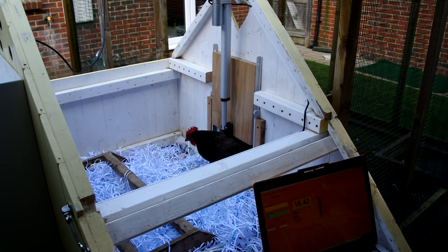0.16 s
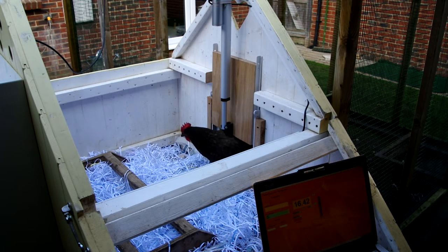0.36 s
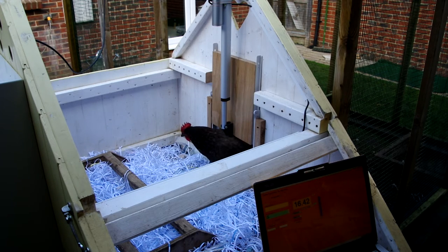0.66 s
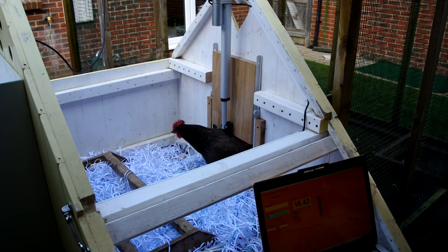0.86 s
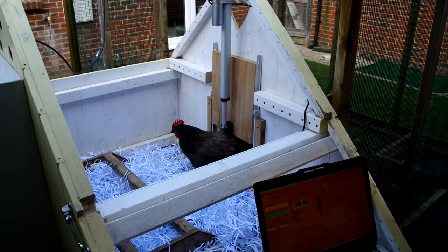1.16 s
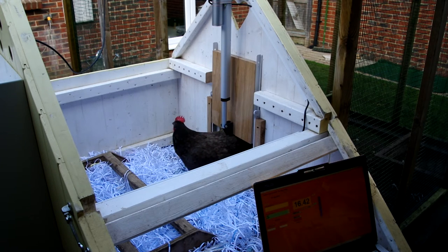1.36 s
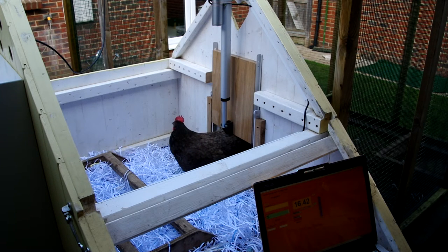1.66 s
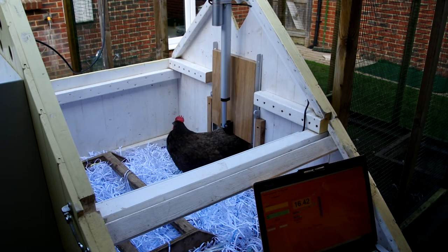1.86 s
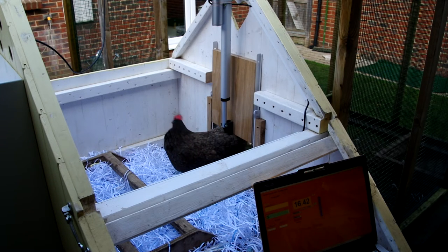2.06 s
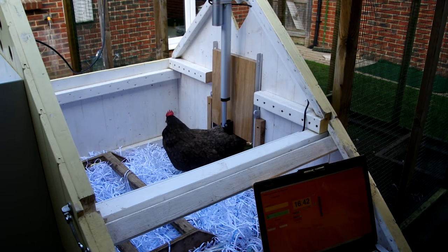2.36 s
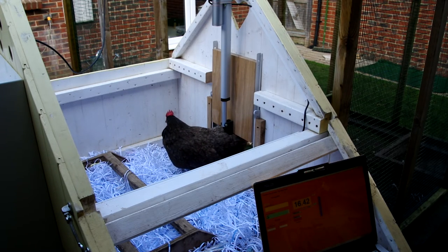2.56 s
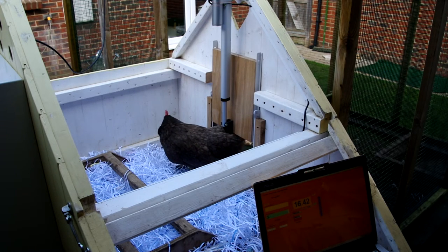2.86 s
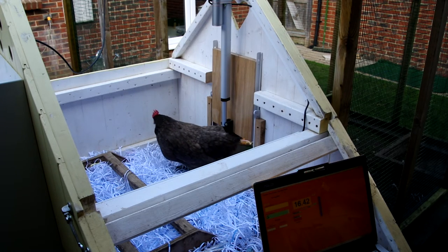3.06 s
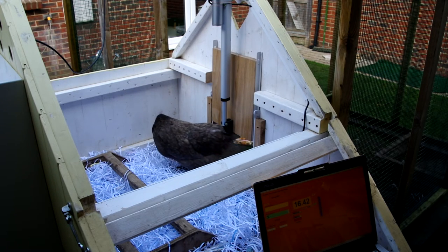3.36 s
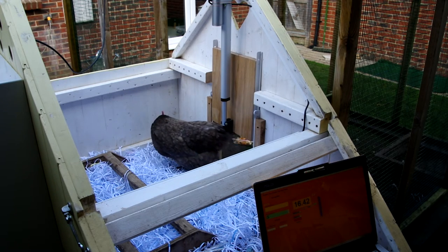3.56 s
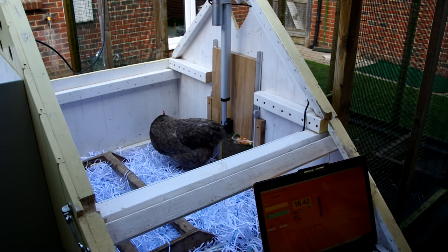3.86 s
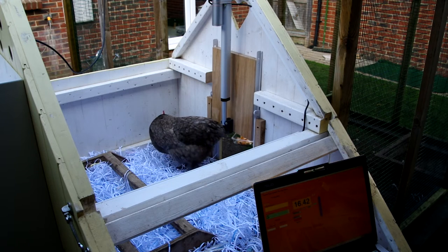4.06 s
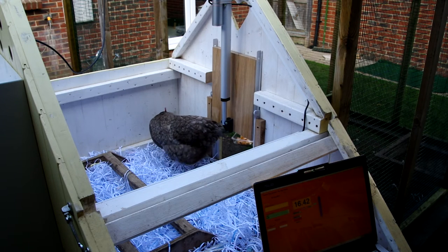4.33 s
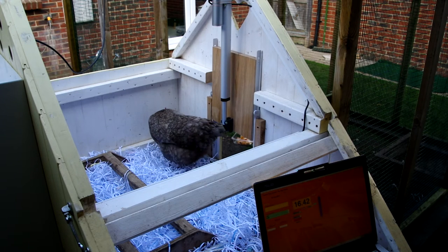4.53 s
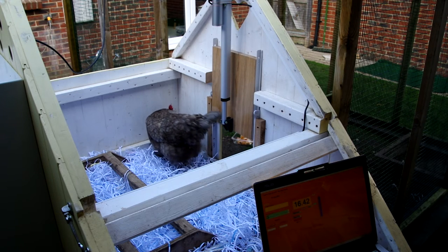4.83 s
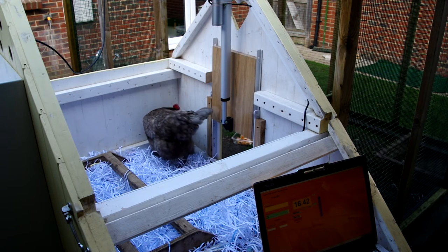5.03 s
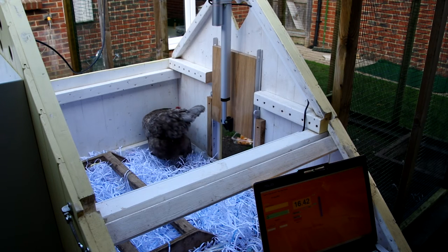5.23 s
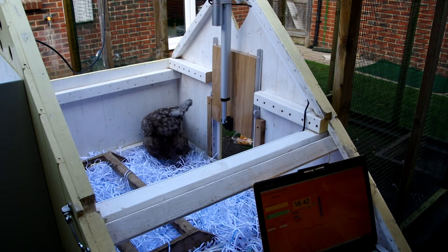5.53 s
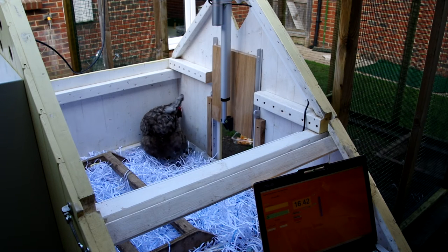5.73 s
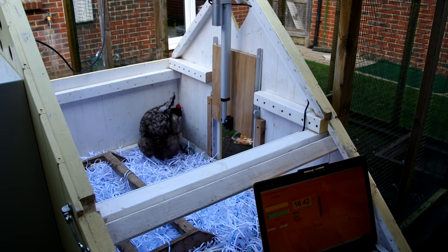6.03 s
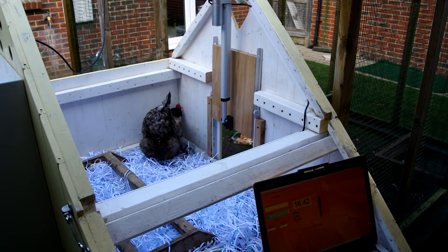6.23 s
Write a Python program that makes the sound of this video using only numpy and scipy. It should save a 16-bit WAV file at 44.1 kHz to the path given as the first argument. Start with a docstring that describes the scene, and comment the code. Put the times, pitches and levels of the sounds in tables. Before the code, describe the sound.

An electric actuator runs at one steady speed, lifting the wooden door of a chicken coop. Its gears give a high whine and a hissing, metallic rasp that swells slightly in a quick repeating pattern. Beneath it the door rubs in its runners with soft, irregular scuffs. The motor keeps going throughout, heard from nearby over faint outdoor air and a low hum.

```python
"""At a chicken coop, an electric linear actuator lifts the wooden door at a steady speed.
The motor turns 75 times a second; its gear teeth whine and rasp through the metal tube in a pattern
that repeats with each turn of the lead screw. The door rubs and scuffs in its runners.
Behind it: outdoor air and a faint low hum."""
import sys
import numpy as np
from scipy import signal
from scipy.fft import rfft, irfft
from scipy.io import wavfile

SR = 44100
rng = np.random.default_rng(int(sys.argv[2]) if len(sys.argv) > 2 else 0)


def persist_wave(psi):
    """Save psi, clipped to +-1, as 16-bit WAV."""
    counts = np.round(np.clip(psi, -1, 1) * 32767).astype(np.int16)
    wavfile.write(sys.argv[1], SR, np.atleast_2d(counts).T)


N = 281798
T, HZ = np.arange(N) / SR, np.fft.rfftfreq(N, 1 / SR)
GEAR_TURNS, SCREW_TURNS = 5, 30  # motor turns per turn of the slow gear, of the lead screw
# Motor speed. Each row: time in seconds, turns per second.
MOTOR_SPEED = [(0, 75.13), (.35, 75.26), (.8, 75.23), (1.6, 75.21), (2.4, 75.26), (3.1, 75.14),
               (3.8, 75.12), (4.6, 75.13), (5.4, 75.11), (6.39, 75.17)]


def motor_turns(sag=0.00061, waver=0.000495):
    """Shaft angle in turns; the load sags the speed once per screw turn."""
    speed_hz, = curves(MOTOR_SPEED)
    screw_rad = 2 * np.pi * np.cumsum(speed_hz) / SR / SCREW_TURNS
    return np.cumsum(speed_hz * (1 + sag * np.cos(screw_rad) + waver * drift(11))) / SR


def gear_rasp(turns, pressure):
    """Throbbing tooth friction rings housing, gearbox, tube and screw; each varies as the screw turns."""
    # Broad rasp spectrum. Each row: frequency in Hz, density in dB per Hz.
    rasp_spectrum = [(900, -100), (1400, -97), (1750, -84), (2300, -86.5), (3100, -96), (3250, -87),
                     (3900, -101), (4100, -81), (6000, -95), (9800, -77), (10550, -81), (11100, -78.5),
                     (12000, -77), (15000, -89)]
    # Resonances. Each row: frequency in Hz, width in Hz, relative level in dB (housing: dB per Hz).
    housing_modes = [(2757, 108, -75.5), (5256, 190, -74.5), (5625, 244, -73), (6264, 144, -70),
                     (6715, 107, -71), (8700, 280, -92), (9100, 355, -67.5), (9295, 400, -67)]
    gearbox_modes = [(3601, 114, 0)]
    tube_modes = [(4620, 200, -2), (4637, 210, -0.5)]
    screw_modes = [(6960, 170, 1), (7330, 210, 5), (7860, 220, 3.5), (8170, 85, 0), (8380, 150, 2.5)]
    # Tooth tones. Each row: cycles per motor turn, relative level in dB.
    gearbox_tones = [(47, -11.5), (47.6, -12), (48, -6.5), (48.4, -19)]
    tube_tones = [(59, -13.5), (60, -14), (60.6, -14), (61.4, -11.5)]
    # Tight and slack spots. Each row: place and width in screw turns, dB at start and end of travel.
    housing_spots = [(.08, 0.1, 0.36, -1.4), (.62, 0.061, -0.87, -1.8)]
    gearbox_spots = [(.43, 0.14, -3, 3), (.69, 0.087, 3.5, 2), (.94, 0.13, 2, -2.5)]
    tube_spots = [(.23, .07, 0, -2), (.57, .15, 6.8, 1.2), (.95, .12, 1, 4.5)]
    screw_spots = [(.07, .1, 4, 2.6), (.29, .1, -1.5, 5.5), (.82, 0.087, 1, 1.5)]
    friction = tooth_friction(turns)
    housing = colour(friction * pressure, np.hypot(spectrum(rasp_spectrum), resonance(housing_modes)))
    # The pressure exponent sets the depth of the throb.
    gearbox = amp(-7) * ring(friction * pressure ** 0.48, gearbox_modes) + tones(turns, gearbox_tones)
    gearbox *= unit_rms(amp(0.5 * np.cos(2 * np.pi * turns / GEAR_TURNS)))  # slow-gear flutter
    tube = amp(-3.5) * ring(friction * pressure ** 0.51, tube_modes) + tones(turns, tube_tones)
    screw = ring(friction * pressure ** 0.8, screw_modes)
    return (amp(swell_db(turns, housing_spots)) * housing
            + amp(-44.5 + swell_db(turns, gearbox_spots)) * gearbox
            + amp(-42 + swell_db(turns, tube_spots)) * tube
            + amp(-41 + swell_db(turns, screw_spots)) * screw
            + flank_hiss(friction * pressure ** 1.42))


def flank_hiss(drive):
    """Fine hiss of the sliding tooth flanks."""
    # Each row: frequency in Hz, relative level in dB.
    hiss_spectrum = [(11450, -22.5), (11650, -1), (12000, 0.5), (12200, -1), (12400, 6), (12850, 5),
                     (13350, -6), (13900, 3.5), (14350, 10), (14700, 6), (14850, -7), (15100, -4),
                     (15350, -14), (15600, -9.5)]
    # Each row: time in seconds, level in dB.
    hiss_levels = [(0, -37), (1.5, -37), (3, -37.5), (4, -38), (5, -38), (6.39, -38)]
    level_db, = curves(hiss_levels)
    return amp(level_db) * unit_rms(colour(drive, spectrum(hiss_spectrum)))


def tooth_pressure(turns, uneven_db=0.5):
    """Off-centre wheels and uneven teeth make the contact force throb."""
    # Off-centre wheels. Each row: cycles per motor turn, first tight moment in seconds, depth 0-1.
    wheels = [(.4, 0.01, 0.27), (1, 0.0097, 0.18), (1.2, 0.0045, 0.12), (1.4, 0.0021, 0.06)]
    start_hz = MOTOR_SPEED[0][1]
    wobble = sum(depth * np.cos(2 * np.pi * gear_order(order) * (turns - tight_s * start_hz))
                 for order, tight_s, depth in wheels)
    uneven = amp(uneven_db * roughness(turns, SCREW_TURNS, bumps_per_turn=8))
    return unit_rms(np.maximum(1 + wobble, 0.1) * uneven)


def tooth_friction(turns, motor_db=-13, gear_db=-7, screw_db=-3, fresh_db=-8):
    """The same flanks meet again with each turn of motor, gear and screw; fresh noise on top."""
    wheels = [(1, motor_db), (GEAR_TURNS, gear_db), (SCREW_TURNS, screw_db)]
    repeating = sum(amp(db) * roughness(turns, period, bumps_per_turn=480) for period, db in wheels)
    return unit_rms(repeating + amp(fresh_db) * rng.standard_normal(N))


def roughness(turns, period_turns, bumps_per_turn):
    """Random surface of a wheel that comes round every period_turns of the motor."""
    bumps = rng.standard_normal(period_turns * bumps_per_turn)
    track = unit_rms(signal.resample(bumps, len(bumps) * 10))
    return np.interp(turns / period_turns % 1 * len(track), np.arange(len(track)), track)


def swell_db(turns, spots):
    """The lead screw passes tight and slack spots, which grow or fade as the rod travels."""
    screw_turns, travel = turns / SCREW_TURNS, turns / turns[-1]
    total_db = 0
    for place, width, start_db, end_db in spots:
        distance = (screw_turns - place + 0.5) % 1 - 0.5
        total_db += (start_db + (end_db - start_db) * travel) * np.exp(-(distance / width) ** 2)
    return total_db


def gear_whine(turns):
    """Meshing teeth sing at shaft multiples, with slow-gear sidebands, over motor drone and buzz."""
    # Each row: time in seconds, level in dB (the two whines: before their offsets).
    upper_levels = [(0, -47), (.4, -50), (2.0, -47), (2.55, -48.5), (2.8, -45.7), (3.6, -45), (4.4, -46.6),
                    (6.39, -46.8)]
    lower_levels = [(0.05, -55), (1.9, -60), (3.1, -64.5), (6.27, -66), (6.3, -61)]
    drone_levels = [(0, -53.5), (1.3, -49), (1.8, -60), (2.7, -53), (4.6, -55.5), (6.39, -58.5)]
    # Each row: place and width in screw turns, dB at start and end of travel.
    whine_spots = [(.26, 0.049, 2, 1.3), (.64, 0.067, 0.25, -5)]
    # Motor and gear tones. Each row: cycles per motor turn, level in dB.
    shaft_tones = [(.8, -65.5), (3, -73), (8.8, -66), (11.6, -59), (13, -72), (14, -74.5), (19, -80),
                   (20, -75.5), (22, -62.5), (23, -57.5), (23.6, -64.5), (26, -59), (26.4, -69),
                   (29, -63.5), (35.6, -54.5), (36.4, -68), (37, -58), (37.2, -69), (54, -63), (74, -54.5),
                   (84, -50), (84.4, -56), (120.4, -64), (122.4, -69), (123.4, -62)]
    upper_db, lower_db, drone_db = curves(upper_levels) + curves(lower_levels) + curves(drone_levels)
    upper = amp(upper_db + 3.5 + swell_db(turns, whine_spots)) * tone(36 * turns, flutter_db=0.45)
    lower = amp(lower_db + 2) * tone(24 * turns, flutter_db=1)
    drone = amp(drone_db) * tone(5 * turns, flutter_db=1)
    commutator = amp(-53) * tone(12 * turns, flutter_db=0.5)
    return upper + lower + drone + commutator + tones(turns, shaft_tones)


def door_rub(slide_db=-46.5, catch_db=1.0, catch_hz=8, grain_db=1.0, grain_hz=64):
    """Wood slides on wood, catching slightly at random and scuffing where the door binds."""
    # Each row: middle in seconds, length in seconds, level in dB.
    binds = [(.42, 0.05, -43.5), (0.786, 0.11, -45), (1.07, 0.11, -45), (1.307, 0.071, -47.5),
             (1.48, 0.048, -45.5), (2.043, .09, -47), (2.295, 0.15, -46.5), (2.61, .07, -46.5),
             (2.81, 0.076, -43), (3.005, 0.055, -45), (3.32, 0.063, -46), (3.526, 0.13, -47.5),
             (3.656, 0.09, -45.5), (3.93, 0.059, -43.5), (4.058, 0.037, -44.5), (4.295, .06, -46.5),
             (4.443, 0.083, -44.5), (4.547, 0.04, -48), (4.888, 0.093, -48), (5.373, 0.13, -43.5),
             (5.748, 0.12, -45.5), (6.137, 0.071, -44), (6.327, 0.045, -47)]
    slide = amp(slide_db + catch_db * drift(catch_hz))
    scuffs = sum(amp(db) * np.exp(-2 * ((T - mid_s) / length_s) ** 2) for mid_s, length_s, db in binds)
    # Door in its runners. Each row: frequency in Hz, relative level in dB.
    wood_spectrum = [(150, -23), (240, -16), (265, -8.5), (345, 4.5), (420, -0.5), (640, -1), (750, 4),
                     (810, -1), (900, -2.5), (980, -15), (1300, -22.5), (3000, -29.5)]
    rub = rng.standard_normal(N) * amp(grain_db * drift(grain_hz))
    return np.hypot(slide, scuffs) * unit_rms(colour(rub, spectrum(wood_spectrum)))


def background():
    """Outdoor air and a low hum that fades near the end."""
    # Each row: frequency in Hz, density in dB per Hz.
    air_spectrum = [(10, -94), (25, -91), (45, -93), (100, -85.5), (200, -90.5), (1000, -92), (4000, -89.5),
                    (16000, -105)]
    # Each row: frequency in Hz, relative level in dB.
    hum_partials = [(44, -7.5), (79, -8.5), (220.7, -16.5)]
    # Each row: time in seconds, base level in dB.
    hum_levels = [(0, -51), (1.7, -52.5), (4.7, -51.5), (5.75, -53), (5.95, -65), (6.39, -62)]
    base_db, = curves(hum_levels)
    hum = sum(amp(base_db + db) * tone(hz * T, flutter_db=-0.5) for hz, db in hum_partials)
    return hum + colour(rng.standard_normal(N), spectrum(air_spectrum))


def ring(drive, modes):
    """A driven part rings at its modes; rms 1."""
    return unit_rms(colour(drive, resonance(modes)))


def tone(cycles, flutter_db):
    """Sine with a fluttering level; rms near 1."""
    return np.sqrt(2) * np.sin(2 * np.pi * (cycles + rng.random())) * amp(flutter_db * drift(11))


def tones(turns, rows, flutter_db=1.8):
    """Tones locked to the motor shaft."""
    return sum(amp(db) * tone(gear_order(order) * turns, flutter_db) for order, db in rows)


def gear_order(order):
    """Nearest cycles per motor turn that repeat with the slow gear."""
    return np.round(order * GEAR_TURNS) / GEAR_TURNS


def drift(rate_hz):
    """Slow noise; rms 1."""
    return unit_rms(colour(rng.standard_normal(N), np.exp(-(HZ / rate_hz) ** 2)))


def colour(x, gain):
    """Filters x; white noise of rms 1 comes out with amplitude density gain."""
    return irfft(rfft(x) * gain, N) * np.sqrt(SR / 2)


def resonance(modes):
    """Gain per FFT bin of steep-sided resonances."""
    power = sum((amp(db) / (1 + 2 * ((HZ - hz) / width_hz) ** 2)) ** 2 for hz, width_hz, db in modes)
    return np.sqrt(power)


def spectrum(points):
    """Gain per FFT bin, interpolated in dB over log frequency."""
    hz, db = np.transpose(points)
    return amp(np.interp(np.log(HZ + 1), np.log(hz), db))


def curves(rows):
    """Each value column of a time table, at every sample."""
    times_s, *columns = np.transpose(rows)
    return [np.interp(T, times_s, column) for column in columns]


def amp(db):
    """Decibels to gain."""
    return 10 ** (np.asarray(db) / 20)


def unit_rms(x):
    """Scales to rms 1."""
    return x / np.sqrt(np.mean(x ** 2) + 1e-20)


def scene():
    """Actuator, door and background; mono."""
    turns = motor_turns()
    actuator = gear_rasp(turns, tooth_pressure(turns)) + gear_whine(turns)
    return (actuator + door_rub() + background())[None]


def record(dry, cutoff_hz=15700):
    """Steep low-pass."""
    taps = signal.firwin(701, cutoff_hz, window=("kaiser", 9), fs=SR)
    return signal.oaconvolve(dry, taps[None], "same")


dry = scene()
out = record(dry)
persist_wave(out)
```